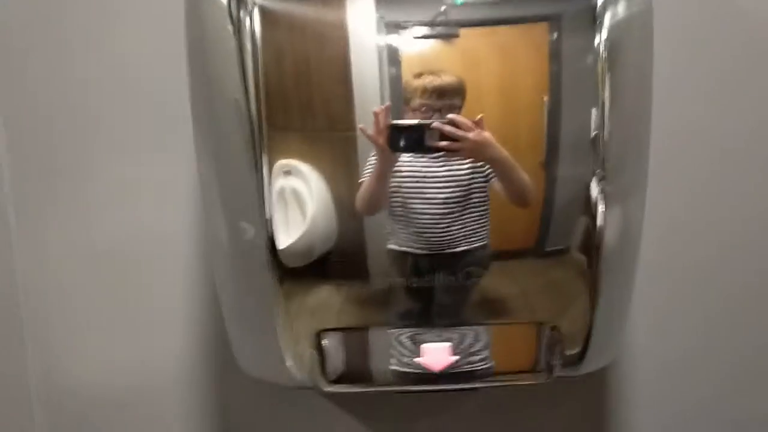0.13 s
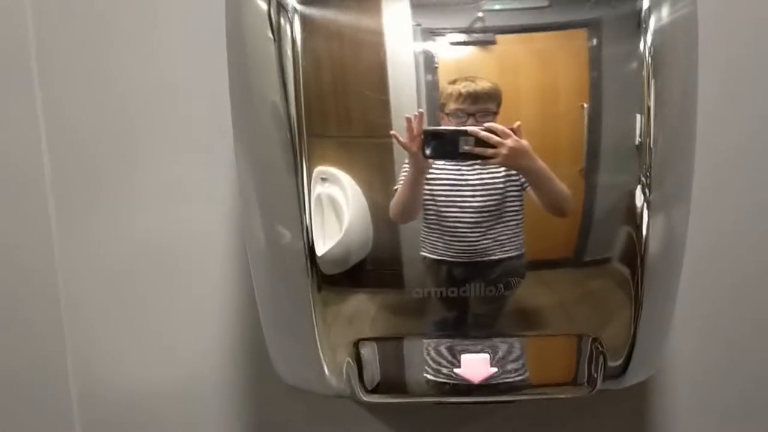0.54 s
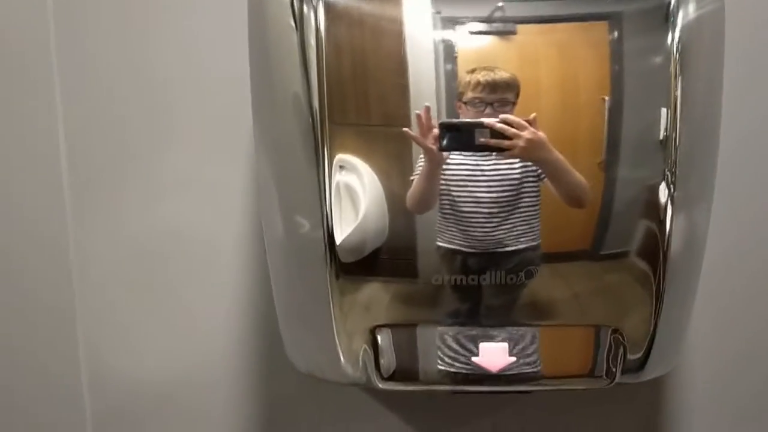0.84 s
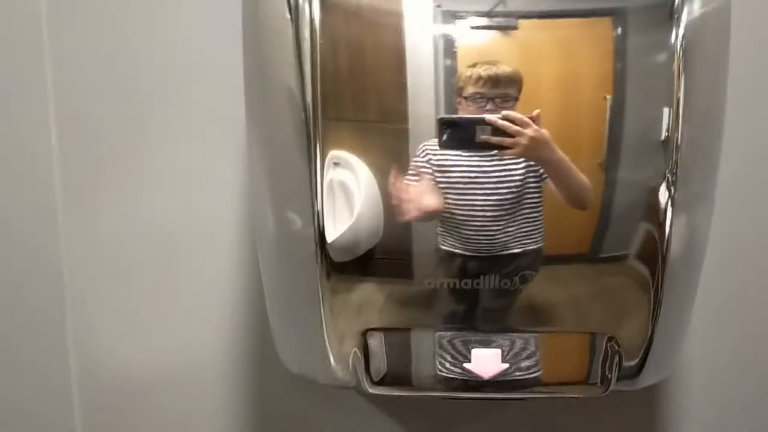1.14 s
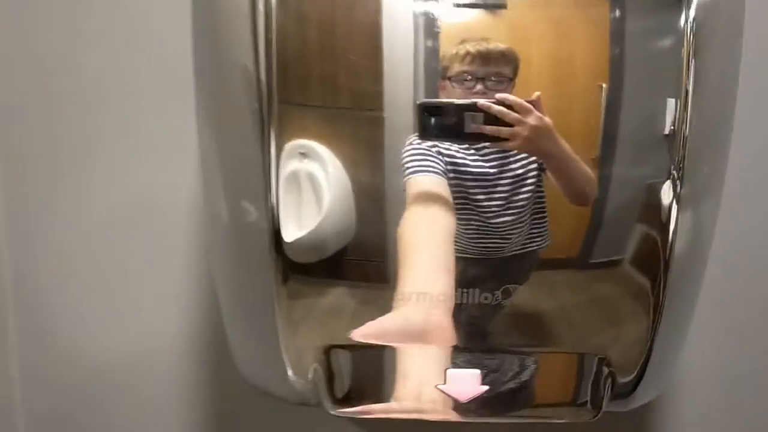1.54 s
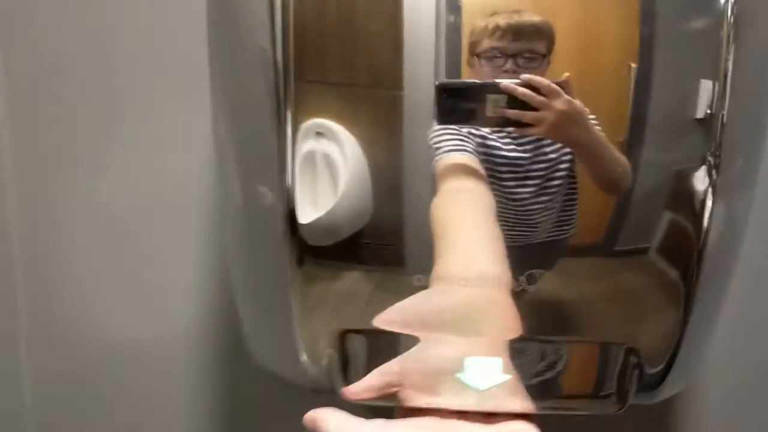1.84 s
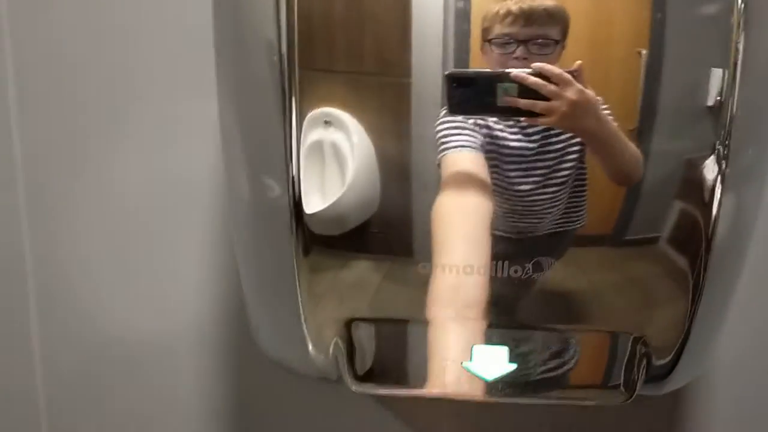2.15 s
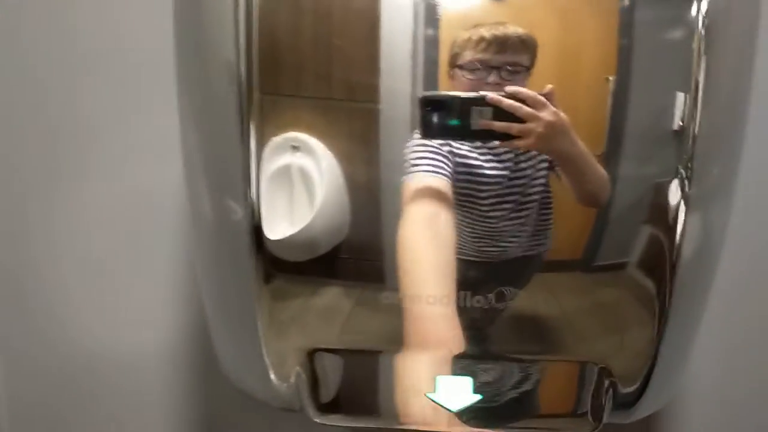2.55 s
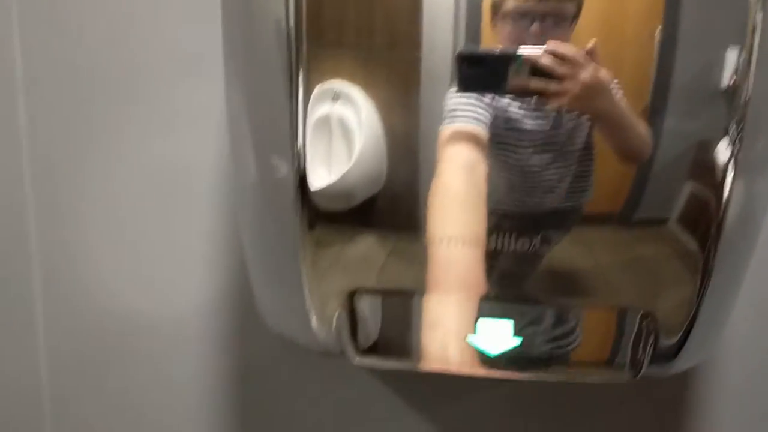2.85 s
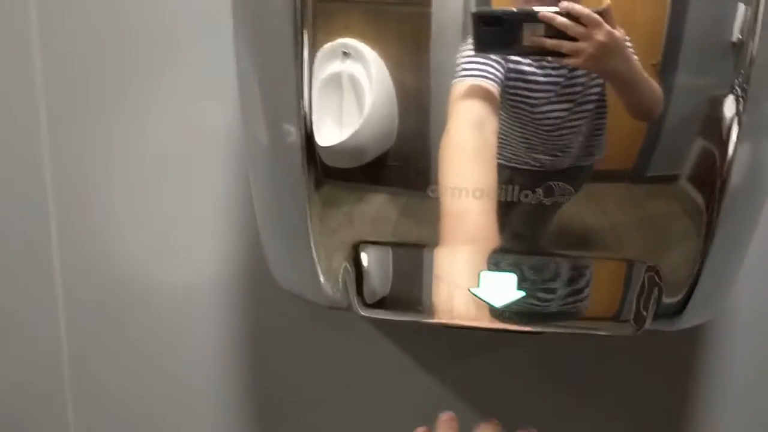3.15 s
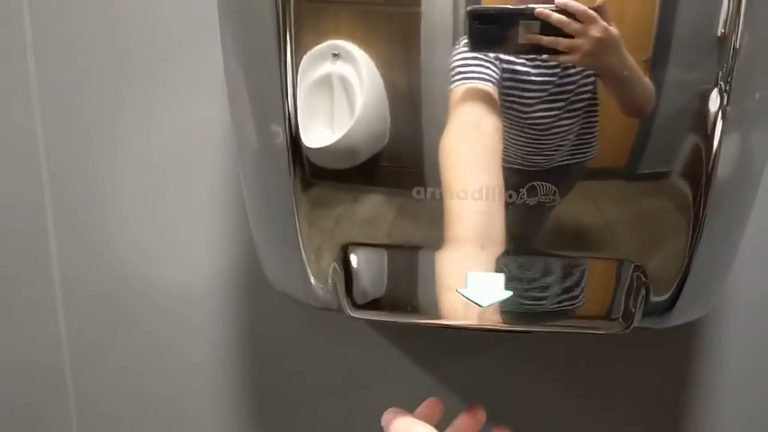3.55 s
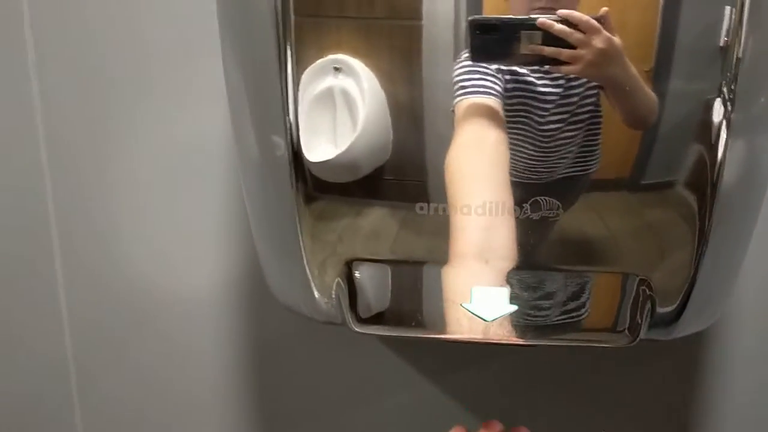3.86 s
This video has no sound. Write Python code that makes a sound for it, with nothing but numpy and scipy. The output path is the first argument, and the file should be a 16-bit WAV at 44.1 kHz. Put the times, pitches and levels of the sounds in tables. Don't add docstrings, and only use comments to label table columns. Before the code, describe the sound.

An electric hand dryer starts with a growl, whines upward and roars in a tiled restroom.

```python
import sys
import numpy as np
from scipy import signal
from scipy.fft import rfft, irfft
from scipy.io import wavfile
from scipy.ndimage import uniform_filter1d

SR = 44100
rng = np.random.default_rng(int(sys.argv[2]) if len(sys.argv) > 2 else 0)


def undo_db(level):
    steps = np.asarray(level, float) / 20
    return 10 ** steps


def dump_mix(stems):
    frames = np.atleast_2d(stems).T
    limited = np.clip(frames, -1, 1)
    pcm = np.round(limited * 32767).astype(np.int16)
    wavfile.write(sys.argv[1], SR, pcm)


N = 176400
MAINS_HZ = 99.5


def level(x, db):
    return x * undo_db(db) / np.sqrt(np.mean(x ** 2))


def curve(table, x, log=False):
    a, b = np.array(table, float).T
    return np.interp(np.log(x), np.log(a), b) if log else np.interp(x, a, b)


def walk(rate_hz):
    hold = max(int(SR / rate_hz), 1)
    steps = np.repeat(rng.standard_normal(N)[:N // hold + 1], hold)
    return 1.36 * uniform_filter1d(uniform_filter1d(steps, hold), hold)[:N]


def noise(gain):
    f = np.maximum(np.arange(N // 2 + 1) * SR / N, .1)
    return irfft(rfft(rng.standard_normal(N)) * gain(f), N)


def coloured(table, slope_db=-30):
    return lambda f: undo_db(curve(table, f, True) + slope_db * np.maximum(np.log2(table[0][0] / f), 0))


def resonance(hz, width_hz):
    return lambda f: 1 / (1 + (2 * (f - hz) / width_hz) ** 2)


def bands(gain, flicker_db, rate_hz, lean_db=0.):
    out = 0
    for step in range(-9, 8):
        bell = lambda f: np.cos(np.pi / 2 * np.clip(2 * np.log2(f / 1500) - step, -1, 1))
        band = noise(lambda f: gain(f) * bell(f))
        out = out + band * undo_db(flicker_db * walk(rate_hz) + lean_db * step / 2)
    return out


def room_air():
    # (frequency [Hz], spectrum level [dB])
    air_colour = [(100, 3), (300, -11), (420, -11.5), (650, -12), (1300, -14), (2600, -23), (4000, -26),
                  (9000, -30)]
    # (frequency [Hz], width [Hz], level [dB])
    vent = [(393, 140, -71.5), (1320, 160, -76), (1770, 160, -83), (2680, 170, -82)]
    air = level(bands(coloured(air_colour, slope_db=-2), 1.3, 10.2), -61)
    hums = sum(level(noise(resonance(hz, width_hz)), db) * undo_db(2.5 * walk(5.86))
               for hz, width_hz, db in vent)
    return air + hums


def grip_rumble(t):
    # (frequency [Hz], spectrum level [dB])
    rumble_colour = [(3, 0.5), (12, -10), (25, -7.5), (50, -19), (100, -30), (200, -34), (400, -65)]
    # (time [s], level [dB])
    grip = [(.22, -15), (.4, -1), (.8, -9), (.87, 1), (.95, -7), (1.3, -4.5), (1.5, 0.5), (1.8, 0.5),
            (2.1, 5), (3.2, 5.5), (3.45, -3.5), (4, -3)]
    return level(noise(coloured(rumble_colour)), -42) * undo_db(2 * walk(5.6) + curve(grip, t))


def ticks(t):
    # (time [s], peak level [dB], pulse length [ms], push -1 or release 1)
    finger_ticks = [(.241, -56, 0.27, -1), (.257, -31.5, 0.66, -1), (0.274, -29.5, 1.3, -1),
                    (.312, -48, .6, 1), (0.359, -35, 0.34, -1), (0.376, -46, .15, -1), (.4, -31, 0.57, 1),
                    (.454, -32.5, 0.34, -1), (.477, -54, .15, -1), (0.555, -35.5, 0.32, 1),
                    (.733, -52, .15, -1), (.81, -48, .5, 1), (0.862, -37, .3, 1)]
    rise_ms = 0.22
    out = 0
    for s, db, length_ms, way in finger_ticks:
        age_ms = np.maximum(t - s, 0) * 1000
        pulse = (1 - np.exp(-age_ms / rise_ms)) * np.exp(-(age_ms / length_ms) ** 2)
        out = out + np.sign(way) * undo_db(db) * pulse
    return out


def crackles(t):
    # (time [s], peak level [dB], decay [ms])
    bursts = [(.242, -62, 1.3), (.236, -62.5, 44), (.312, -54, 1), (.359, -57, 2), (.372, -56, 0.59),
              (.378, -60, 1), (.467, -59, 1), (.477, -67, 1), (.555, -69, 0.91), (.733, -63, 1.5),
              (.86, -66, 1.5)]
    # (frequency [Hz], spectrum level [dB])
    crackle_colour = [(2500, -20), (5000, -8), (8000, -9), (12000, -2.5)]
    swell = sum(undo_db(db) * (t > s) * np.exp(-np.maximum(t - s, 0) * 1000 / decay_ms)
                for s, db, decay_ms in bursts)
    return level(noise(coloured(crackle_colour, slope_db=-16)), 16.5) * swell


def sleeve(t):
    # (middle [s], rise [s], fall [s], level [dB])
    strokes = [
        (.245, 0.0091, 0.037, -78),
        (.35, 0.021, 0.052, -62),
        (.84, 0.041, 0.04, -60.5),
        (1.59, 0.31, 0.11, -60),
    ]
    # (frequency [Hz], spectrum level [dB])
    sleeve_colour = [(300, 9), (500, 17.5), (1000, 6.5), (2200, 4.5), (3200, -2), (9000, -9)]
    sweep = sum(undo_db(db) * np.exp(-((t - s) / np.where(t < s, rise_s, fall_s)) ** 2)
                for s, rise_s, fall_s, db in strokes)
    return level(noise(coloured(sleeve_colour, slope_db=-14)), 0) * sweep * undo_db(1.8 * walk(60.7))


def case_flex(t):
    # (time [s], depth [dB], length [ms])
    squeezes = [(.3, -36, 16), (.376, -31, 15), (.404, -35, 7.6), (.468, -30, 21), (1.023, -33, 3),
                (1.156, -35, 15)]
    # (time [s], level [dB], length [ms])
    releases = [(.86, -30, 2.3), (1.029, -33, 3.3)]
    press = sum(undo_db(db) * np.exp(-((t - s) * 2000 / length_ms) ** 2) for s, db, length_ms in squeezes)
    spring = sum(undo_db(db) * np.exp(-np.abs(t - s) * 1000 / length_ms) for s, db, length_ms in releases)
    return spring - press


def case_snap(t):
    # (frequency [Hz], level [dB], T60 [s])
    modes = [(393, 3.5, 0.028), (1050, 3, 0.0092), (1920, -0.5, 0.0071), (2920, -9, 0.0048),
             (3650, 2, 0.0032), (4740, -3, 0.0025), (9500, 13, 0.0017)]
    age = np.maximum(t - 1.0207, 0)
    ring = sum(undo_db(db) * np.exp(-age * np.log(1000) / t60_s) * np.sin(2 * np.pi * hz * age)
               for hz, db, t60_s in modes)
    return -undo_db(-33) * ring


def mains_growl(run_s):
    # (multiple of MAINS_HZ, inrush level [dB], running level [dB], inrush fade [s])
    growl_parts = [(1, -27, -42.5, 0.071), (2, -38, -48.5, 0.25), (3, -59, -42.5, 0.4),
                   (4, -58.5, -66, 0.087), (6, -48.5, -68, 0.11), (9, -52, -74, 0.08),
                   (5.02, -60, -66, 0.09), (10.7, -45, -70, 0.08), (22, -53, -62, 0.092)]
    inrush_shape, ease_db_s = 1.4, -3
    out = 0
    for k, inrush_db, running_db, fade_s in growl_parts:
        inrush = undo_db(inrush_db) * np.exp(-(run_s / fade_s) ** inrush_shape)
        swell = inrush + undo_db(running_db + ease_db_s * run_s)
        out = out + swell * undo_db(2.0 * walk(9.39)) * np.cos(k * 2 * np.pi * MAINS_HZ * run_s)
    return np.sqrt(2) * out * (1 - np.exp(-run_s / 0.0087))


def motor_whine(run_s):
    # (multiple of shaft rate, full-speed level [dB], surge while accelerating [dB], unsteadiness [dB])
    whine = [
        (1, -33, 6, 1.3),
        (3, -16, -6, 3),
        (8, -38, 13, 2.5),
        (9, -37, 13, 1.8),
    ]
    # (frequency [Hz], level [dB])
    shaft_colour = [(150, -12), (200, -3), (235, -16), (280, -14), (308, 0), (333, 5), (348, -8), (358, 6),
                    (385, -13), (420, -1)]
    # (frequency [Hz], level [dB])
    lower_colour = [(2050, -34), (2250, -1), (2400, -16), (2490, 2), (2610, -4), (2720, 4), (2780, -17),
                    (2950, -3), (3350, -1)]
    # (frequency [Hz], level [dB])
    upper_colour = [(2000, -34), (2260, -4), (2520, -18), (2650, 5), (2720, -2), (2810, 8), (2950, -10),
                    (3060, 3), (3600, -5), (3750, 3), (3800, 2)]
    top_shaft_hz, fast_s, slow_s, slow_share = 424.2, .1, .355, .59
    torque_ripple = 1.1
    lag = (1 - slow_share) * np.exp(-run_s / fast_s) + slow_share * np.exp(-run_s / slow_s)
    speed = 1 - lag
    shaft_hz = top_shaft_hz * speed * (1 + 0.001433 * walk(24.9))
    turn = 2 * np.pi * np.cumsum(shaft_hz) / SR
    colours = {1: shaft_colour, 9: upper_colour}
    out = 0
    for k, db, surge_db, rough_db in whine:
        housing_db = curve(colours.get(k, lower_colour), k * shaft_hz + 1, True)
        tone_db = db + surge_db * lag * 3.53 + housing_db + rough_db * walk(29.61)
        out = out + undo_db(tone_db) * speed ** 2 * np.sin(k * turn)
    ripple = 1 + torque_ripple * lag * np.cos(2 * np.pi * MAINS_HZ * run_s)
    return np.sqrt(2) * out * ripple, speed


def brush_noise(run_s):
    # (frequency [Hz], spectrum level [dB])
    brush_colour = [(300, 7), (700, -4), (1100, 9.5), (1600, -5.5), (2250, -5.5), (2950, 3.5), (3300, -5),
                    (9000, -17)]
    pulse = 1 + 0.39 * np.cos(2 * np.pi * MAINS_HZ * run_s)
    return level(noise(coloured(brush_colour)), -39) * pulse * np.clip(run_s / 0.02, 0, 1)


def housing_ring():
    # (frequency [Hz], width [Hz], level [dB])
    modes = [(610, 180, -16.5), (697, 20, -2.5), (873, 36, 2), (1015, 59, 2.5), (1139, 126, 2.5),
             (1273, 57, 4), (1443, 33, 0), (1807, 160, -7), (2107, 61, -4), (2287, 66, -8.5),
             (2550, 160, -8.5), (2750, 140, -1.5)]
    ring = sum(undo_db(db + 2.5 * walk(6.91)) * level(noise(resonance(hz, width_hz)), 0)
               for hz, width_hz, db in modes)
    return level(ring, -7)


def lip_hiss(speed, t):
    # (frequency [Hz], spectrum level [dB])
    nozzle_colour = [(4000, -17.5), (8000, 1), (10500, 8.5), (15500, 6)]
    hiss = level(bands(coloured(nozzle_colour, slope_db=-15), 0.55, 12.2), -22) * speed ** 1.75
    shade_db, shade_from_s, shade_s = -16, 3.2, 0.52
    return hiss * undo_db(shade_db * np.clip((t - shade_from_s) / shade_s, 0, 1))


def palm_flares(t):
    # (middle [s], centre [Hz], length [s], level [dB])
    flares = [(2.62, 2660, .03, -22), (3.33, 2700, .02, -27), (3.68, 1310, .04, -28), (3.2, 180, .07, -41),
              (2.5, 1050, .12, -27), (1.96, 200, .05, -40)]
    return sum(level(noise(lambda f: 1 / (1 + (12 * (f / hz - 1)) ** 4)), db) * np.exp(-((t - s) / length_s) ** 2)
               for s, hz, length_s, db in flares)


def jet(speed, t):
    # (frequency [Hz], spectrum level [dB])
    jet_colour = [(60, -29.5), (170, -11), (250, -12.5), (420, -5), (1100, -3), (1750, -6), (2600, -6),
                  (7000, -12.5)]
    # (time [s], level [dB])
    hand = [(1.84, -1), (2.0, 4), (2.1, 0.5), (2.3, -3), (2.5, 1.5), (2.54, -0.5), (2.61, 3), (2.71, -4),
            (2.8, 1.5), (3.05, -0.3), (3.17, 1), (3.4, -0.06), (3.7, 0), (3.78, -1.5), (3.86, 1.05),
            (4, -0.6)]
    flow_power, brighten_db_s, lip_follow = 3.04, 0.45, 0.7
    lean_db = -2 * (1 - speed) + brighten_db_s * (t - 3)
    rush = level(bands(coloured(jet_colour, slope_db=-6), 1.3, 14, lean_db), 0)
    hand_db = curve(hand, t) + .5 * walk(9)
    roar = (rush + housing_ring() * speed) * speed ** flow_power * undo_db(-17 + hand_db)
    return roar + lip_hiss(speed, t) * undo_db(lip_follow * hand_db) + palm_flares(t)


def tiled_echo(x):
    t60_s = 0.54
    age = np.arange(SR) / SR
    tail = rng.standard_normal(SR) * np.exp(-age * np.log(1000) / t60_s) * (age > .004)
    return undo_db(-10) * signal.fftconvolve(x, tail / np.sqrt(np.sum(tail ** 2)))[:N]


def scene():
    on_s, tone_echo = 1.843, .4
    t = np.arange(N) / SR
    run_s = np.maximum(t - on_s, 0)
    handling = grip_rumble(t) + ticks(t) + crackles(t) + sleeve(t) + case_flex(t) + case_snap(t)
    tones, speed = motor_whine(run_s)
    dryer = (tones + jet(speed, t) + brush_noise(run_s)) * (t > on_s)
    echo = tiled_echo(dryer - (1 - tone_echo) * tones)
    return (room_air() + handling + mains_growl(run_s) + dryer + echo)[None]


def top_cut(x):
    return signal.sosfilt(signal.butter(12, 15720, fs=SR, output="sos"), x)


def record(dry):
    # (frequency [Hz], level [dB])
    mic = [(1600, -0.5), (2650, 4), (3300, -3), (3900, -8.5), (6000, -14), (7800, -25.5), (10000, -26),
           (15500, -30.5)]
    # (frequency [Hz], spectrum level [dB])
    hiss_colour = [(3000, 0), (6500, -4), (10000, 4), (15000, 3)]
    open_s, open_fade_s, top_hz, limit = 0.218, 0.015, 15720, 0.99
    offset_peak, offset_rise_s, offset_settle_s = -0.042, 0.096, 0.73
    age = np.maximum(np.arange(N) / SR - open_s, 0)
    f = np.arange(N // 2 + 1) * SR / N + 1
    warm_db = -6 * np.exp(-age / .5)
    hiss = level(noise(coloured(hiss_colour, slope_db=-3)), -79.5) * undo_db(warm_db)
    heard = irfft((rfft(dry) * undo_db(curve(mic, f, True)) + rfft(hiss)) * (f < top_hz), N)
    heard = limit * np.tanh(heard / limit)
    offset = offset_peak * (1 - np.exp(-(age / offset_rise_s) ** 2)) * np.exp(-age / offset_settle_s)
    return top_cut(heard * np.clip(age / open_fade_s, 0, 1) + offset)


dry = scene()
out = record(dry)
dump_mix(out)
```